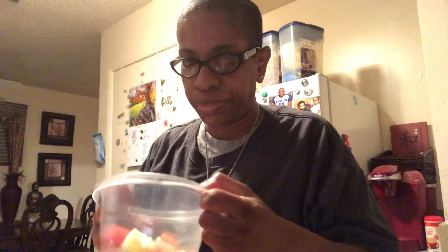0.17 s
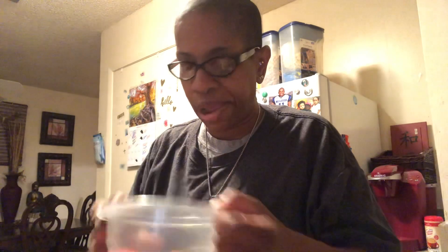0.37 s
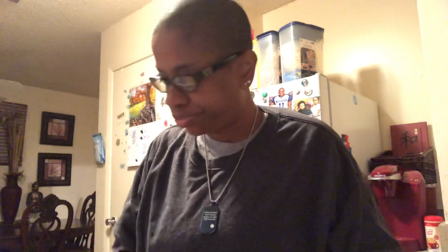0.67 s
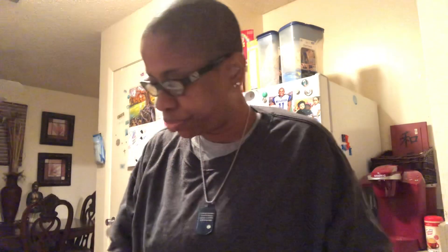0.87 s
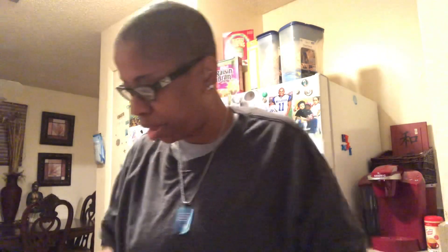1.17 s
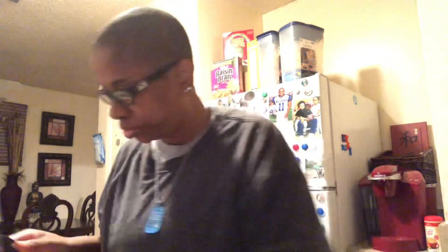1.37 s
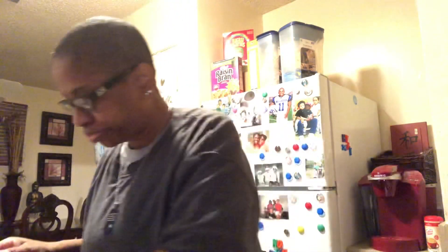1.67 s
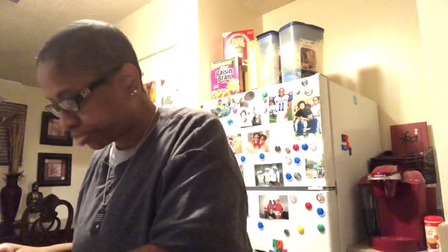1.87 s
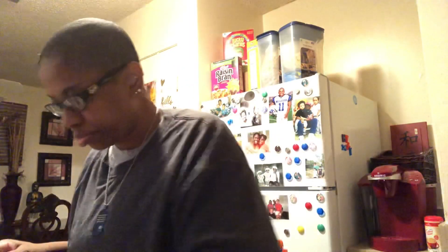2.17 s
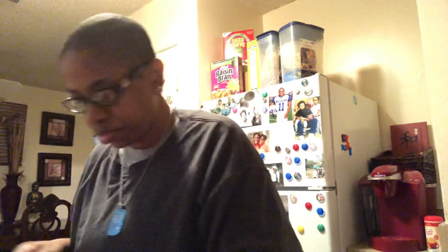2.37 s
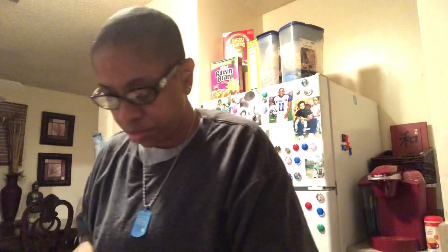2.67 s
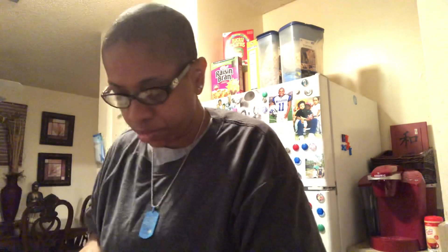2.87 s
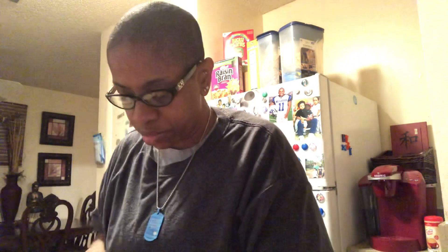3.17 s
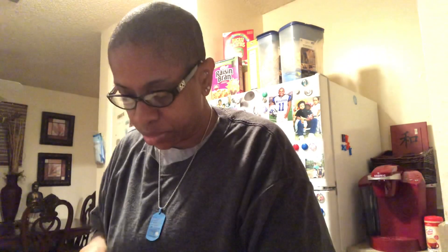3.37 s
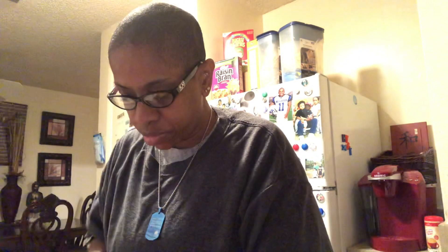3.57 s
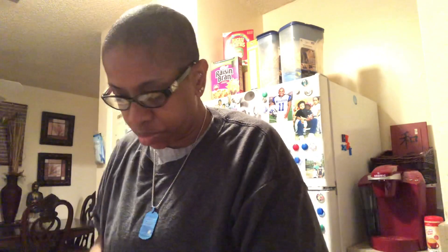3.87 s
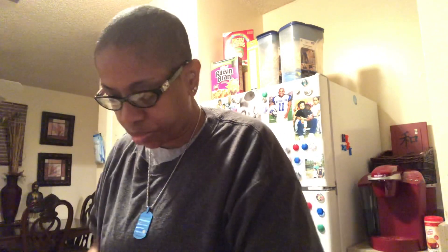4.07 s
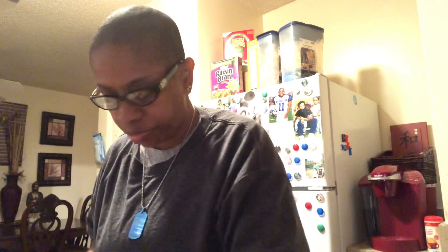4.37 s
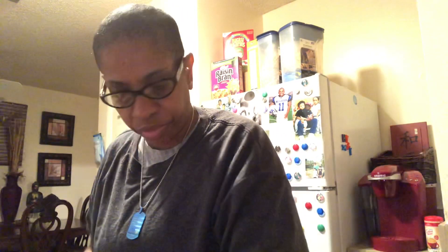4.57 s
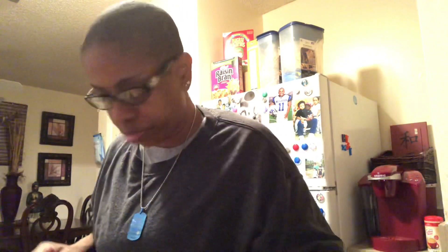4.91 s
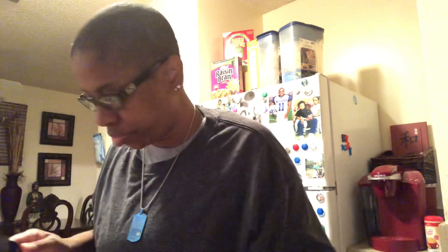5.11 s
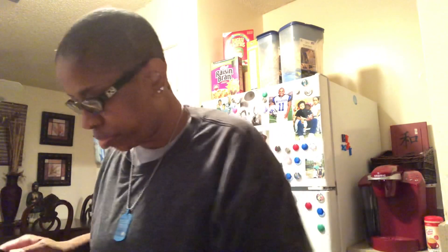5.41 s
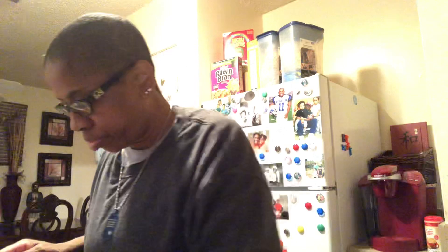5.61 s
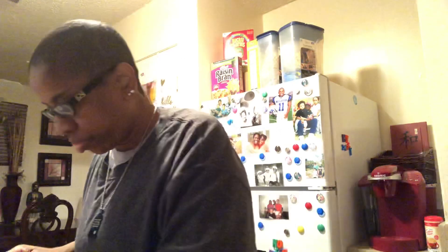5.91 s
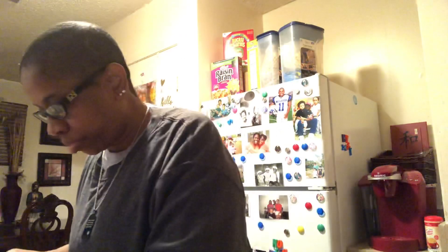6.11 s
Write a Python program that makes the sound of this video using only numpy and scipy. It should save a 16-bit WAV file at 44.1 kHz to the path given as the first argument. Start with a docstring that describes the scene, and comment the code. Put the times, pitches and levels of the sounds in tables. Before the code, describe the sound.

Over a running microwave's hum and fan, a plastic container lands on the counter, then a knife cuts through food with one sharp knock.

```python
"""Kitchen work beside a running microwave

The bed is the oven: transformer hum, a faint high-voltage buzz, and a fan blowing through the vents.
Up close a plastic tub is set down on the counter; later a knife slides through food and knocks on the
board. Each knock rings a set of modes under a short clack. Handling ticks, sleeve scuffs and soft
footfalls fill the gaps, and a small kitchen puts its tail on the counter work."""
import sys
import numpy as np
from scipy import signal
from scipy.fft import rfft, irfft
from scipy.io import wavfile

SR = 44100
rng = np.random.default_rng(int(sys.argv[2]) if len(sys.argv) > 2 else 0)


def log_audio(samples):
    """Write samples as a 16-bit WAV file to the path given in sys.argv[1]."""
    # one column per channel
    frames = np.atleast_2d(samples).T
    # limit to full scale, then quantise
    limited = np.clip(frames, -1, 1)
    pcm = np.round(limited * 32767).astype(np.int16)
    wavfile.write(sys.argv[1], SR, pcm)


N = 275625
MAINS_HZ, FAN_SHAFT_HZ, TOP_HZ = 60.01, 39.28, 15900

# Transformer hum. Each row: multiple of the mains frequency, rms level in dB.
HUM_HARMONICS = [(2, -41), (3, -52), (4, -41.5), (5, -66.5), (6, -56.5), (7, -59.5), (8, -62.5),
                 (10, -66.5), (16, -72.5), (30, -75)]
# Tones of the four-blade fan. Each row: multiple of the shaft speed, rms level in dB.
FAN_HARMONICS = [(1, -74), (4, -39), (7, -63.5), (8, -60), (12, -65.5), (18, -66.5), (20, -65.5),
                 (21, -73.5), (24, -77), (28, -65), (32, -67.5)]
# Outline of the buzz. Each row: frequency in Hz, base level of a harmonic there in dB.
BUZZ_OUTLINE = [(1000, -80), (2300, -78.5), (2800, -110), (3650, -81.5), (4400, -92), (4900, -89),
                (5600, -104), (6400, -86), (6900, -102), (8900, -104), (9600, -113), (10100, -104),
                (11000, -112), (15700, -116)]

# Resonances: the casing lifts the buzz into a whine, the cabinet colours the air, the sliding edge sings.
# Each row: centre in Hz, width in Hz, boost in dB.
CASING_WHINE = [(6540, 50, 6), (10200, 50, 13)]
CABINET_PEAKS = [(110, 11.7, 2.7), (353, 79, 7.2), (563, 60, 7.3), (832.5, 16, 8.5), (980, 34, 2.5),
                 (1060, 24, 3), (1212, 63, 4.1), (1687, 53, 7.9), (1859, 108, 7.7), (2430, 120, 4.6),
                 (3240, 630, 5.45), (3940, 1200, 4.1)]
EDGE_SQUEAK = [(7200, 300, 6), (9200, 270, 5), (10650, 450, 8)]

# The tub lands rim first, then with its weight; the knife edge first, then flat.
# Each row: start in seconds, gain in dB, contact bandwidth in Hz.
TUB_BLOWS = [(.6772, -11, 14000), (.6835, -16.5, 14000), (.6850, -2, 397), (.6930, -8.5, 198)]
KNIFE_BLOWS = [(3.4376, -13, 11000), (3.4392, -9.5, 5000), (3.4446, -1, 1500), (3.4535, -19, 1100)]
# Ring of the tub and of the board. Each row: pitch in Hz, relative level in dB, seconds to fall 60 dB.
TUB_MODES = [(69.5, -11, 0.21), (102, -2, 0.024), (229, -8.5, 0.046), (311, -11.5, 0.11), (457, -12, 0.012),
             (921, -11, 0.12), (2110, -8.5, 0.023), (2500, -5, 0.011), (3300, -9, 0.01), (4400, -18, 0.03)]
BOARD_MODES = [(82, -14.5, 0.14), (131, -16.5, 0.055), (352, -7.5, 0.031), (520, -14, 0.07),
               (1034, -23, .08), (1270, -21.5, 0.1), (1400, -20, 0.085), (1584, -13, 0.053),
               (2320, -32, 0.076), (3560, -9.5, 0.015), (3950, -22, 0.018), (4730, -20, .015)]
# Handling ticks. Each row: start in seconds, base body level in dB, base snap level in dB, ring in Hz.
TICKS = [(0.2304, -51, -40.5, 8200), (0.2588, -63, -52, 7000), (0.3012, -52, -55, 6000),
         (0.3122, -48.5, -51, 3540), (0.8699, -42.5, -48, 3600), (1.1077, -50.5, -50.5, 7130),
         (1.1606, -48, -56, 2670), (1.6232, -56.5, -63, 7100), (2.3755, -57, -70, 4500),
         (5.227, -49, -50, 4500)]
# Strokes over the counter and through food, and strokes of a sleeve.
# Each row: fastest moment in seconds, level there in dB, half length in seconds.
SLIDE_STROKES = [(1.1, -70, .05), (1.32, -67, .06), (3.44, -52, 0.078), (3.72, -60, 0.086), (3.9, -68, .03)]
SLEEVE_STROKES = [(2.63, -60, 0.035), (2.87, -64, .04), (3.38, -62, 0.14), (3.72, -63, .06)]
# Footfalls. Each row: start in seconds, peak level in dB.
FOOTFALLS = [(2.39, -46), (3.11, -42), (3.88, -47), (5.16, -42), (5.26, -47)]

# Colours of the noise layers. Each row: frequency in Hz, relative spectral level in dB.
AIR_RUSH = [(12, -66), (20, -43), (64, -16.5), (92, -12), (153, -8.5), (196, -13.5), (252, -17),
            (289, -17.5), (362, -15), (649, -24), (811, -20), (1450, -26), (1720, -25.5), (2090, -30),
            (15500, -63.5)]
TUB_CLACK = [(350, -28), (640, -28), (927, -10), (1600, -17), (2610, -5.5), (5150, -16), (6850, -22),
             (15500, -35)]
BOARD_CLACK = [(260, -13), (470, -1), (830, -23), (1610, -2), (1860, -11.5), (2660, -4.5), (2950, -18),
               (3740, -10.5), (4400, -19.5), (7730, -20.5), (9510, -40), (15500, -55)]
TICK_BODY = [(1500, -13), (3000, -3), (4300, -9.5), (6000, -12.5), (9000, -43)]
TICK_SNAP = [(3000, -27), (5500, -2), (7500, 6.5), (10000, -5.5), (15500, -10)]
SLIDE_HISS = [(2500, -0.5), (5500, -3.5), (7700, -6.5), (10500, -15.5), (15500, -17.5)]
SLEEVE_RUB = [(1500, -20), (2700, 0), (3500, 11), (5000, -8), (9000, -30)]
TUB_WASH = [(400, -1.5), (650, -11), (920, 2), (1200, -8), (1700, -7), (2100, -17), (3200, -7),
            (4600, -13.5), (7600, -17), (9000, -27), (15500, -24)]
BOARD_WASH = [(290, -22), (500, -10), (648, -11), (803, -13.5), (1050, -.5), (1410, -8.5), (1770, -6.5),
              (3010, -14), (3430, -12.5), (3850, -22.5), (7780, -26), (9370, -39), (15500, -44)]

# The kitchen's tail. Each row: frequency in Hz, seconds to fall 60 dB.
ROOM_T60 = [(80, 0.66), (300, 0.39), (1000, 0.45), (2500, 0.41), (6000, 0.33), (15000, 0.18)]


def oven():
    """The bed: the supply hums and buzzes while the fan adds blade tones and a rush of air."""
    air = gain_of(-45.5) * noise(AIR_RUSH, N, CABINET_PEAKS)
    hum = drone(HUM_HARMONICS, MAINS_HZ, drift=0.00021)
    fan = drone(FAN_HARMONICS, FAN_SHAFT_HZ, drift=0.000894)
    return hum + fan + supply_buzz() + air


def drone(harmonics, hz, drift, waver_db=0.5):
    """Harmonics locked to one slightly drifting cycle, each wavering a little in level."""
    turns = np.cumsum(hz * (1 + drift * wander(2.45))) / SR
    out = np.zeros(N)
    for order, db in harmonics:
        level = np.sqrt(2) * gain_of(db + waver_db * wander(0.99))
        out += level * np.cos(2 * np.pi * (order * turns + rng.random()))
    return out


def supply_buzz(scatter_db=3.5, waver_db=2.0, size=8192):
    """The high-voltage supply repeats one ragged waveform in every mains cycle."""
    hz = np.arange(size // 2 + 1) * MAINS_HZ
    ragged_db = scatter_db * np.clip(rng.standard_normal(len(hz)), -2, 2)
    levels = gain_of(curve_at(BUZZ_OUTLINE, hz) + boost_db(CASING_WHINE, hz) - ragged_db)
    levels *= (hz > 1000) & (hz < TOP_HZ)
    cycle = irfft(levels * np.exp(2j * np.pi * rng.random(len(hz)))) * size / np.sqrt(2)
    looped = np.interp(np.arange(N) * MAINS_HZ / SR, np.arange(size) / size, cycle, period=1)
    return looped * gain_of(waver_db * wander(3.8))


def knock(blows, modes, clack_colour, clack_db, clack_t60, low_cut_hz):
    """Each blow rings the modes under a short, dense clack; softer contact dulls the top."""
    t, out = np.arange(SR // 2) / SR, np.zeros(N)
    ring = sum((-1) ** k * gain_of(db - 60 * t / t60) * np.sin(2 * np.pi * hz * t)
               for k, (hz, db, t60) in enumerate(modes))
    for start, db, contact_hz in blows:
        clack = gain_of(clack_db - 60 * t / clack_t60) * noise(clack_colour, len(t))
        contact = signal.butter(1, contact_hz, fs=SR)
        add(out, start, gain_of(db) * signal.lfilter(*contact, ring + clack))
    # a small panel radiates no deep bass
    return signal.sosfilt(signal.butter(4, low_cut_hz, "high", fs=SR, output="sos"), out)


def handling_ticks(body_trim_db=4.5, snap_trim_db=2.0, t60=0.018, ring_trim_db=-3, ring_t60=0.028):
    """Light touches of plastic and blade: a bright snap over a small body that rings briefly."""
    t, out = np.arange(SR // 10) / SR, np.zeros(N)
    for start, body_db, snap_db, hz in TICKS:
        body = gain_of(body_db + body_trim_db) * noise(TICK_BODY, len(t))
        snap = gain_of(snap_db + snap_trim_db) * noise(TICK_SNAP, len(t))
        ring = gain_of(body_db + ring_trim_db - 60 * t / ring_t60) * np.sin(2 * np.pi * hz * t)
        add(out, start, (body + snap) * gain_of(-60 * t / t60) + ring)
    return out


def slides(grain_db=1.0):
    """Grainy hiss of things sliding on the counter and of the blade in the food."""
    grain = gain_of(grain_db * wander(120))
    return swells(SLIDE_STROKES) * grain * noise(SLIDE_HISS, N, EDGE_SQUEAK)


def sleeve_scuffs():
    """Cloth brushes past in short, soft swells."""
    return swells(SLEEVE_STROKES) * noise(SLEEVE_RUB, N)


def footfalls(floor_hz=78, rise_s=0.017):
    """Each step swells and dies in one low mode of the floor."""
    t, out = np.arange(SR // 3) / SR, np.zeros(N)
    thud = t / rise_s * np.exp(1 - t / rise_s) * np.sin(2 * np.pi * floor_hz * t)
    for start, db in FOOTFALLS:
        add(out, start, gain_of(db) * thud)
    return out


def knock_wash(start, colour, db):
    """The diffuse wash that a loud knock leaves in the room."""
    out = np.zeros(N)
    add(out, start, gain_of(db) * room_decay(noise(colour, SR)))
    return out


def kitchen_reverb(send):
    """Dense reflections off the walls smear the send into a short tail."""
    tail = room_decay(rng.standard_normal(SR))
    return signal.fftconvolve(send, tail / np.linalg.norm(tail))[:N]


def room_decay(x, rise_s=0.011):
    """Reflections build up quickly, then each band dies at its own speed."""
    hz, t, bands = signal.stft(x, SR, nperseg=256)
    fade = gain_of(-60 * t / curve_at(ROOM_T60, hz)[:, None])
    tail = signal.istft(bands * fade, SR, nperseg=256)[1][:len(x)]
    build_up = 1 - np.exp(-(np.arange(len(x)) / SR / rise_s) ** 2)
    return tail * build_up


def swells(strokes, shape=1.25):
    """Rubbing gets louder and softer with each stroke's speed; shape 1 is a cusp, 2 a round bell."""
    t = np.arange(N) / SR
    return sum(gain_of(db) * np.exp(-np.minimum(abs(t - centre) / half, 20) ** shape)
               for centre, db, half in strokes)


def noise(colour, size, peaks=()):
    """Noise of rms 1 with a broad colour and resonant peaks."""
    hz = np.fft.rfftfreq(size, 1 / SR)
    eq = gain_of(curve_at(colour, hz) + boost_db(peaks, hz))
    return unit_rms(irfft(rfft(rng.standard_normal(size)) * eq, size))


def wander(rate_hz):
    """Smooth random modulation of rms 1, rolling off around rate_hz."""
    hz = np.fft.rfftfreq(N, 1 / SR)
    return unit_rms(irfft(rfft(rng.standard_normal(N)) * np.exp(-(hz / rate_hz) ** 2), N))


def boost_db(peaks, hz):
    """The bell-shaped lift of a set of resonances."""
    return sum(db / (1 + (2 * (hz - centre) / width) ** 2) for centre, width, db in peaks)


def curve_at(points, hz):
    """Interpolates a table on a log-frequency axis."""
    knots_hz, values = np.transpose(points)
    return np.interp(np.log(hz + 1), np.log(knots_hz + 1), values)


def add(mix, start, sound):
    """Mixes a sound in at start seconds."""
    part = mix[round(start * SR):][:len(sound)]
    part += sound[:len(part)]


def gain_of(db):
    return 10 ** (np.asarray(db) / 20)


def unit_rms(x):
    return x / np.sqrt(np.mean(x ** 2) + 1e-20)


def scene():
    """The mono mix: a steady oven bed and soft steps, with the counter work up front and sent to reverb."""
    tub = knock(TUB_BLOWS, TUB_MODES, TUB_CLACK, clack_db=-5.5, clack_t60=0.023, low_cut_hz=47)
    knife = knock(KNIFE_BLOWS, BOARD_MODES, BOARD_CLACK, clack_db=-1.5, clack_t60=0.02, low_cut_hz=63.6)
    wash = knock_wash(TUB_BLOWS[0][0], TUB_WASH, db=-31)
    wash += knock_wash(KNIFE_BLOWS[0][0], BOARD_WASH, db=-24)
    handling = handling_ticks() + slides() + sleeve_scuffs()
    room = kitchen_reverb(gain_of(-16) * tub + gain_of(-15.5) * knife + gain_of(-7) * handling)
    return (oven() + tub + knife + handling + footfalls() + wash + room)[None]


def record(dry):
    """The microphone sheds the deepest bass, and a steep low-pass trims the very top."""
    low_cut = signal.butter(2, 35, "high", fs=SR, output="sos")
    high_cut = signal.firwin(511, TOP_HZ, window=("kaiser", 9), fs=SR)
    return signal.oaconvolve(signal.sosfilt(low_cut, dry), high_cut[None], "same")


dry = scene()
out = record(dry)
log_audio(out)
```